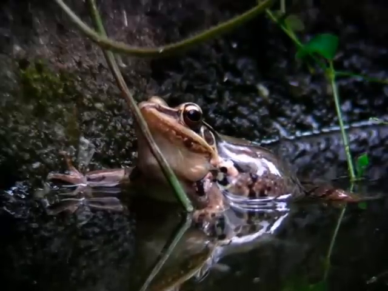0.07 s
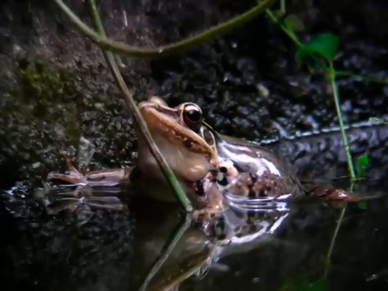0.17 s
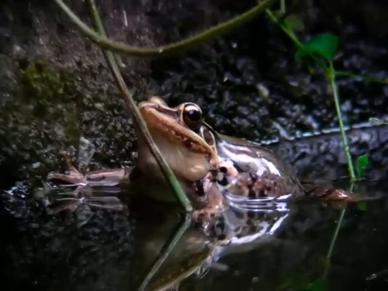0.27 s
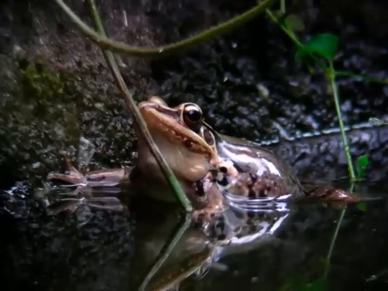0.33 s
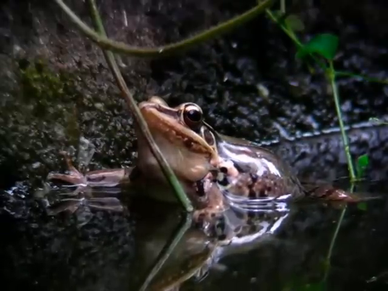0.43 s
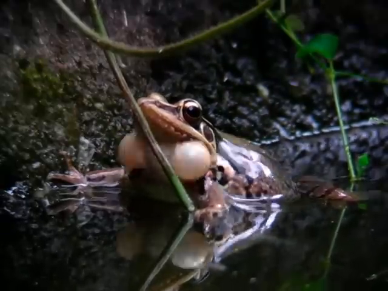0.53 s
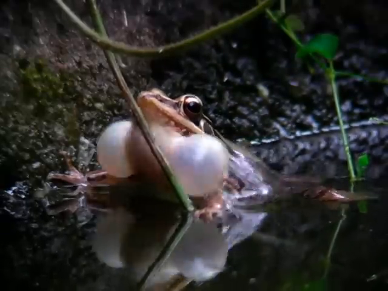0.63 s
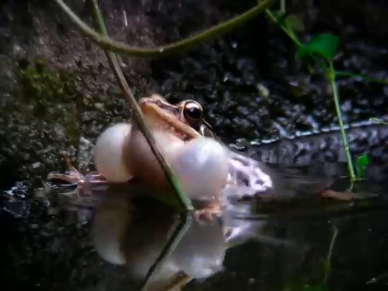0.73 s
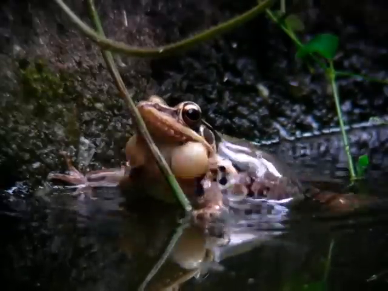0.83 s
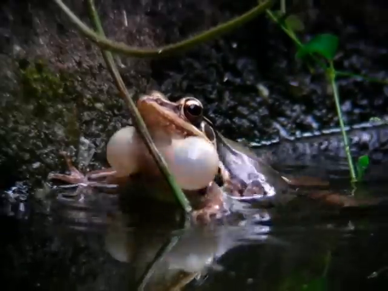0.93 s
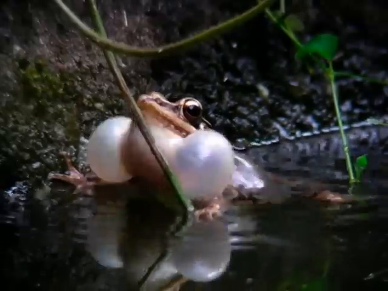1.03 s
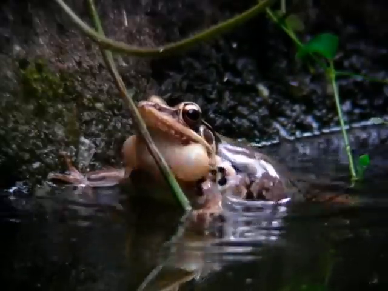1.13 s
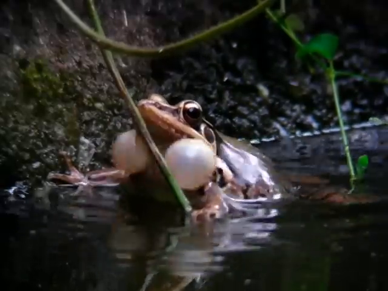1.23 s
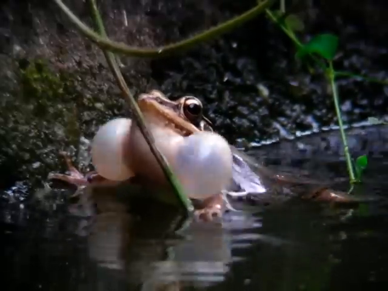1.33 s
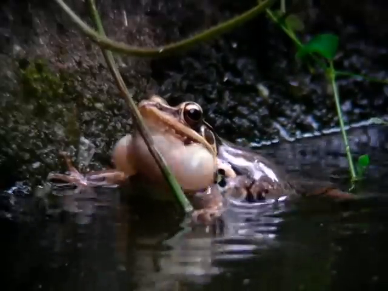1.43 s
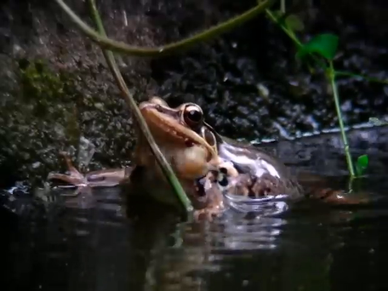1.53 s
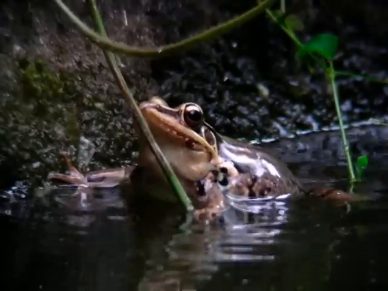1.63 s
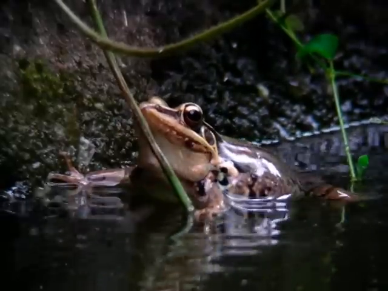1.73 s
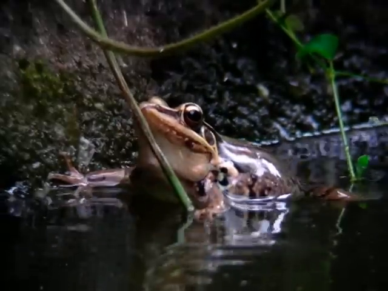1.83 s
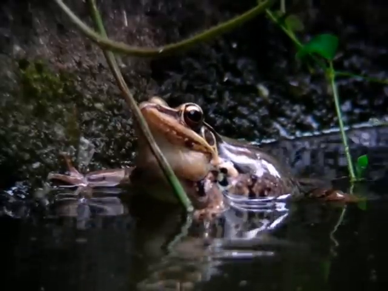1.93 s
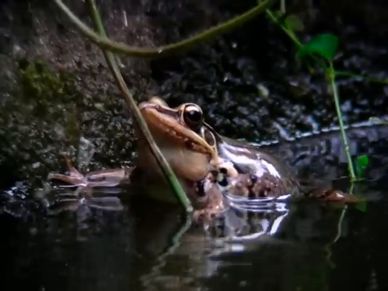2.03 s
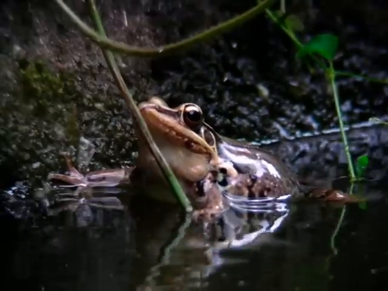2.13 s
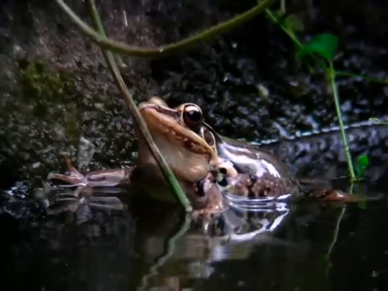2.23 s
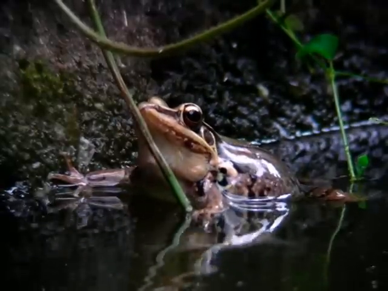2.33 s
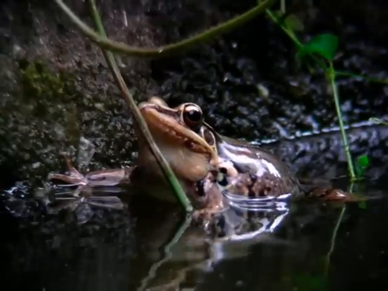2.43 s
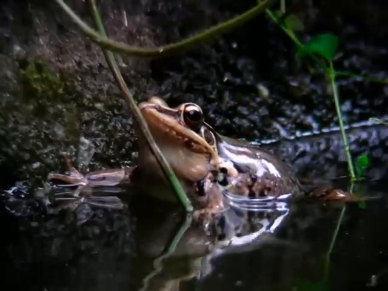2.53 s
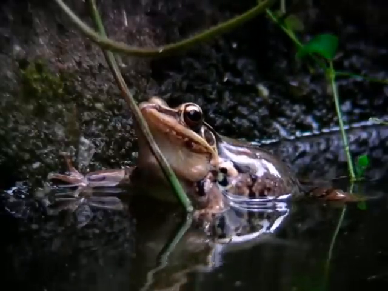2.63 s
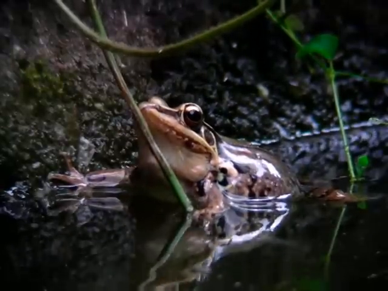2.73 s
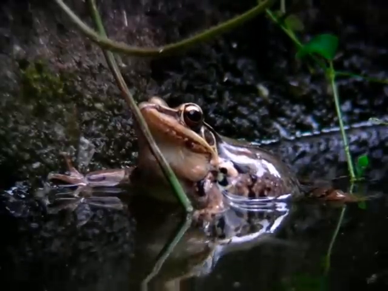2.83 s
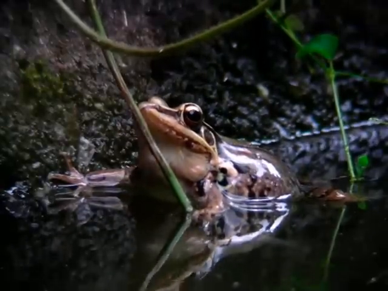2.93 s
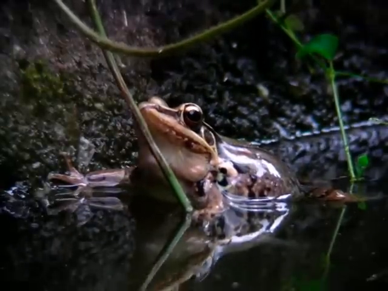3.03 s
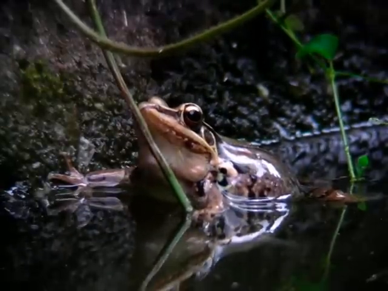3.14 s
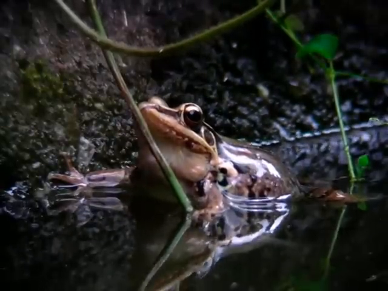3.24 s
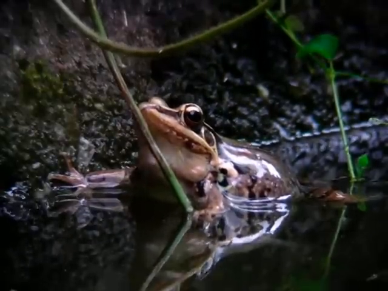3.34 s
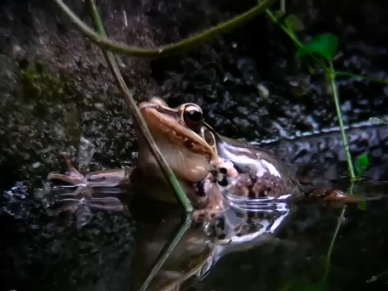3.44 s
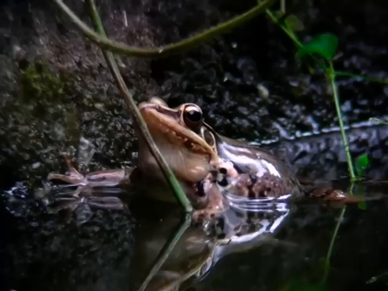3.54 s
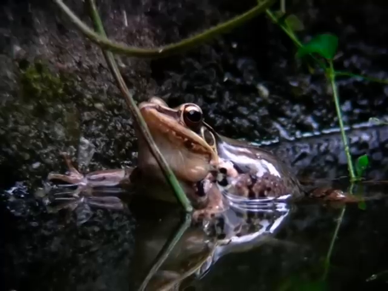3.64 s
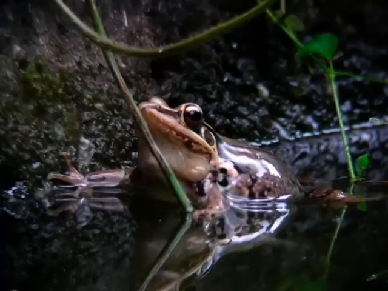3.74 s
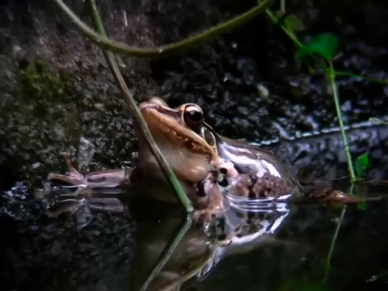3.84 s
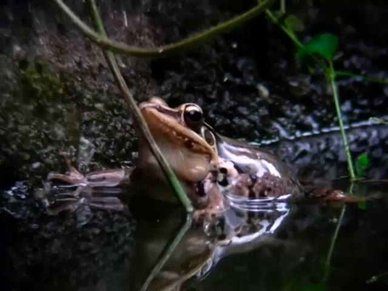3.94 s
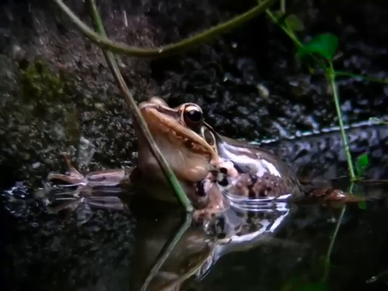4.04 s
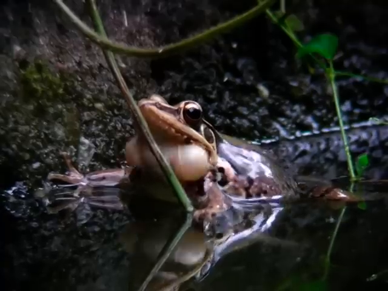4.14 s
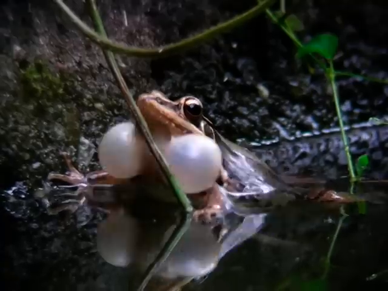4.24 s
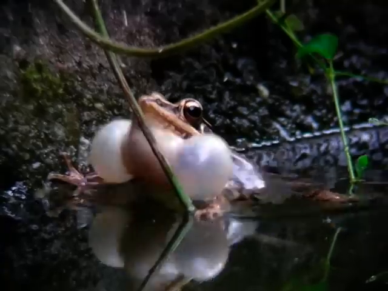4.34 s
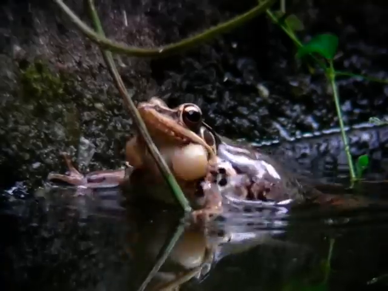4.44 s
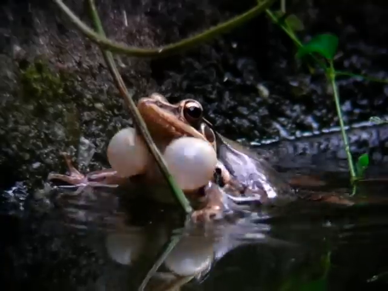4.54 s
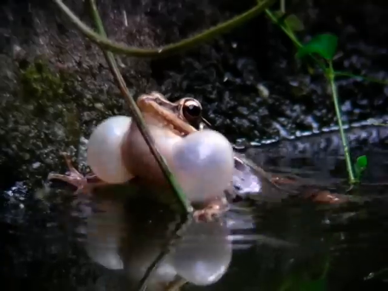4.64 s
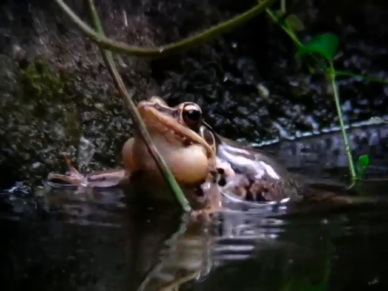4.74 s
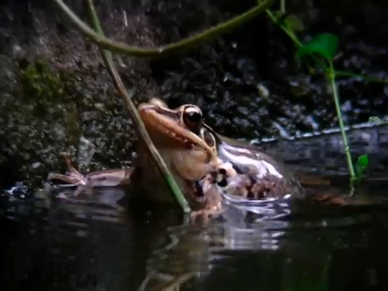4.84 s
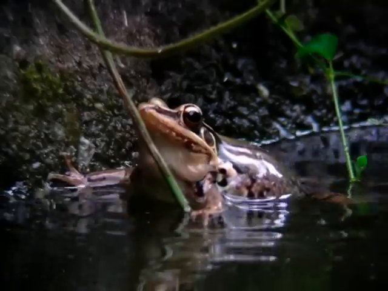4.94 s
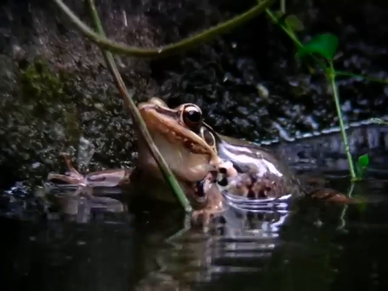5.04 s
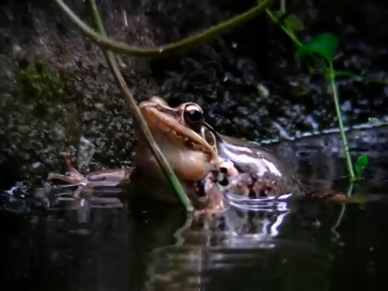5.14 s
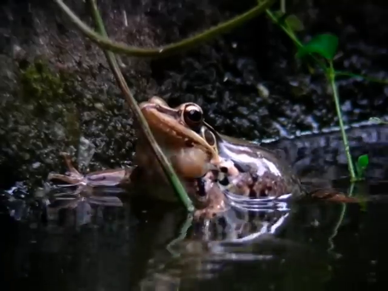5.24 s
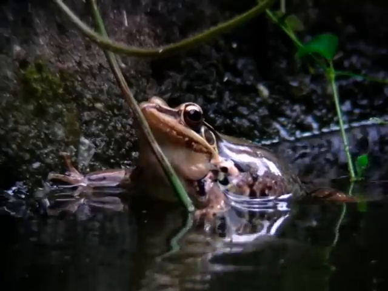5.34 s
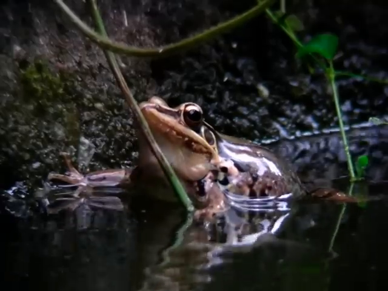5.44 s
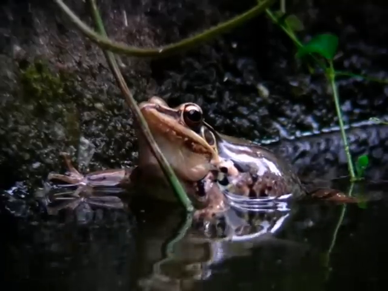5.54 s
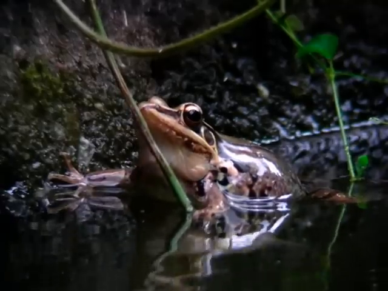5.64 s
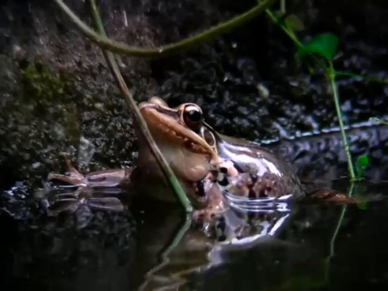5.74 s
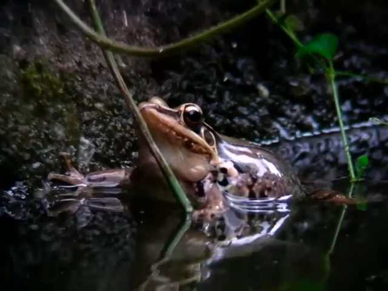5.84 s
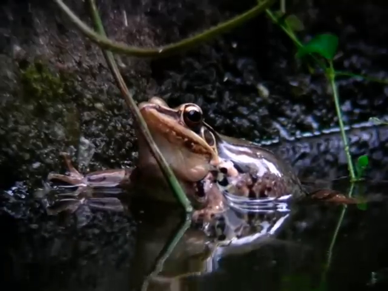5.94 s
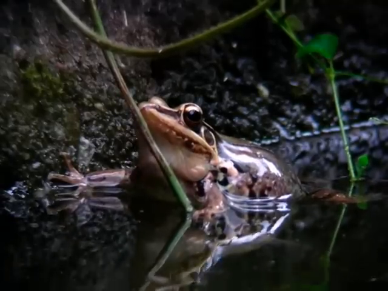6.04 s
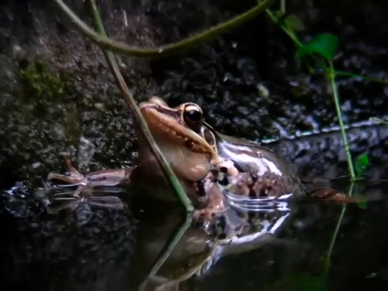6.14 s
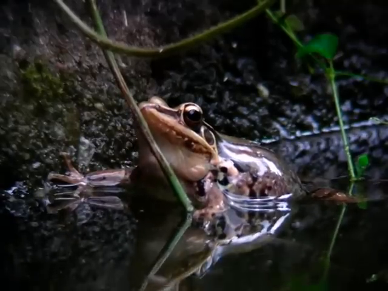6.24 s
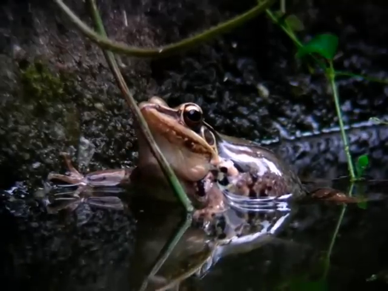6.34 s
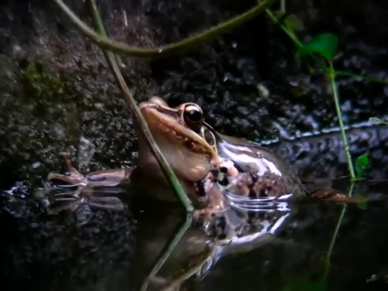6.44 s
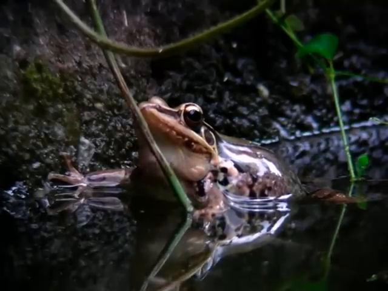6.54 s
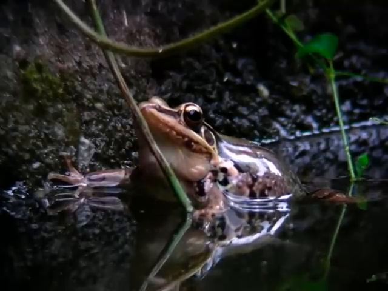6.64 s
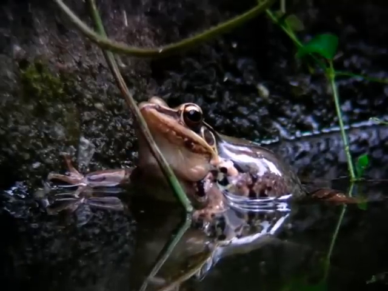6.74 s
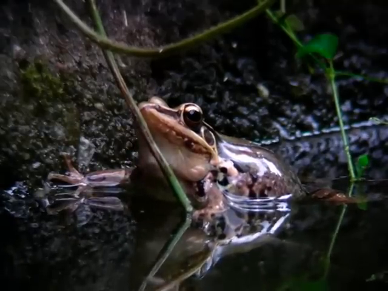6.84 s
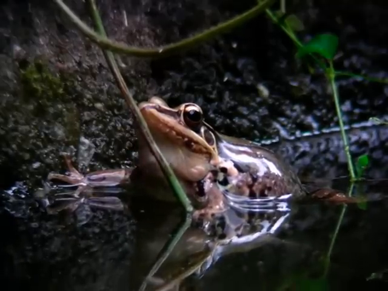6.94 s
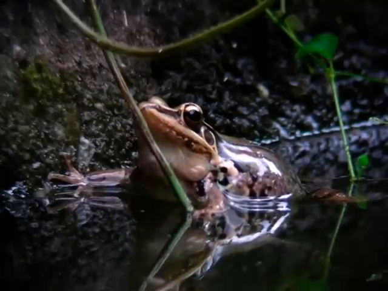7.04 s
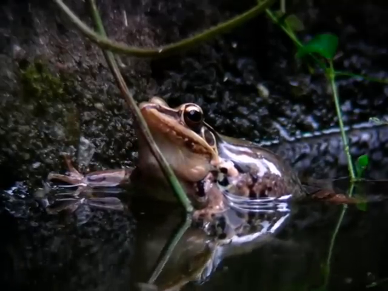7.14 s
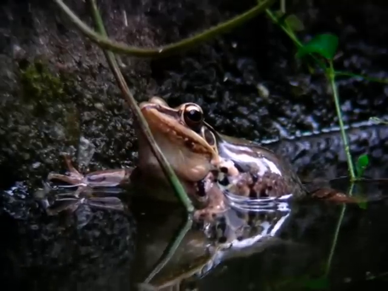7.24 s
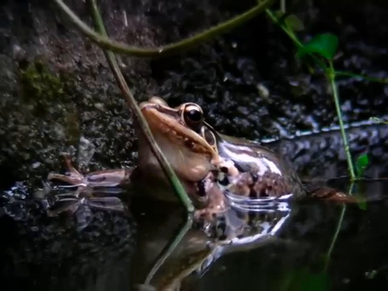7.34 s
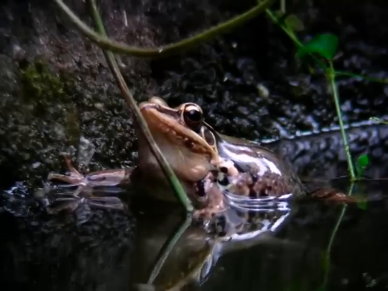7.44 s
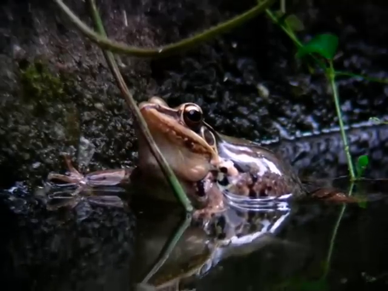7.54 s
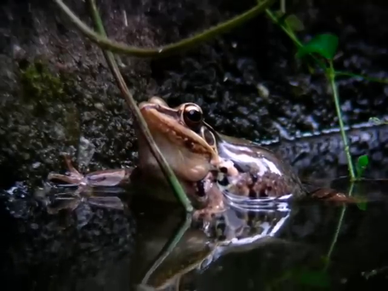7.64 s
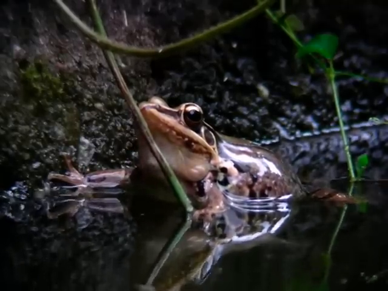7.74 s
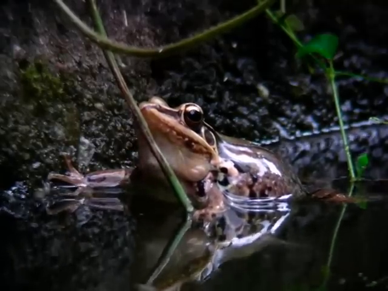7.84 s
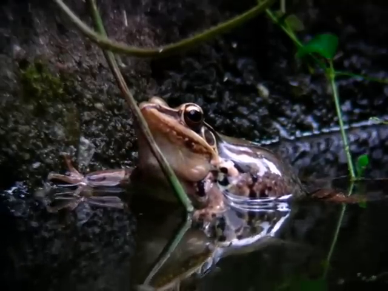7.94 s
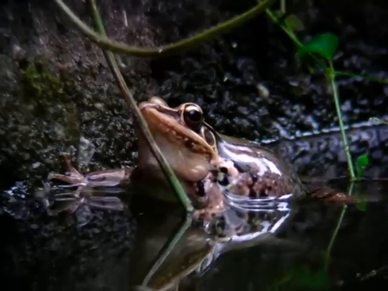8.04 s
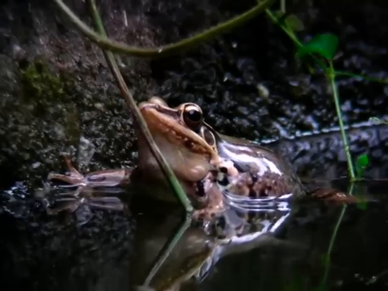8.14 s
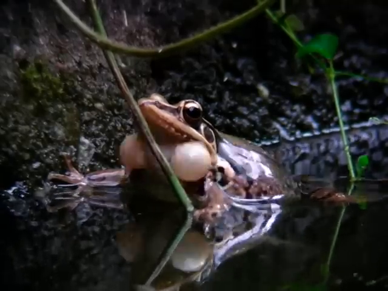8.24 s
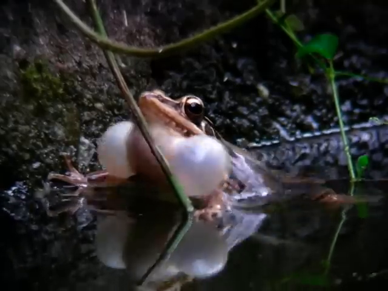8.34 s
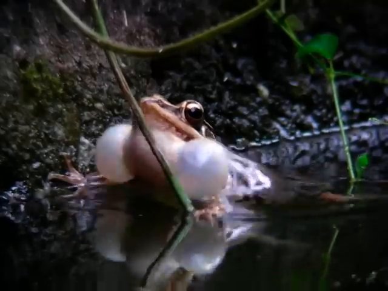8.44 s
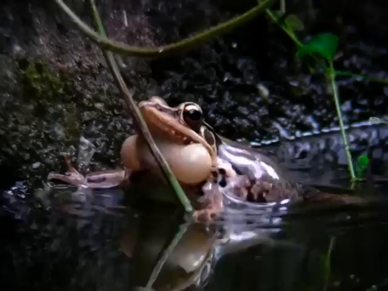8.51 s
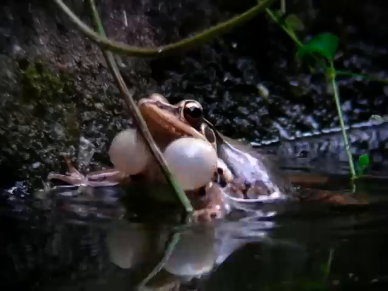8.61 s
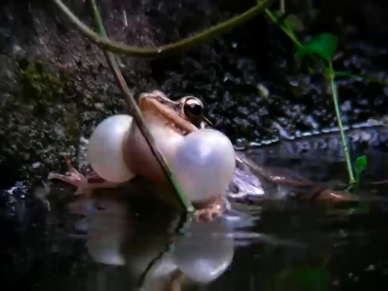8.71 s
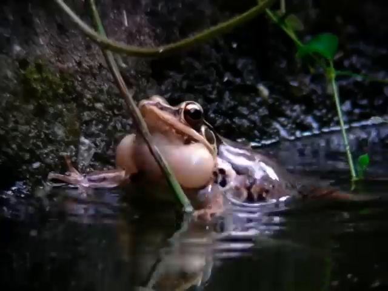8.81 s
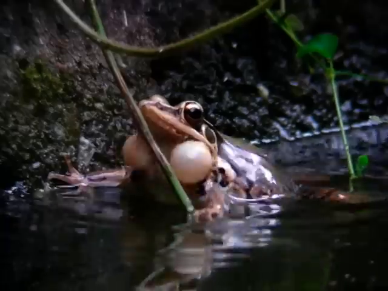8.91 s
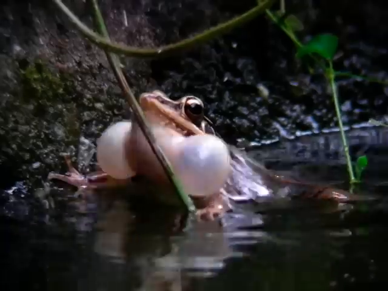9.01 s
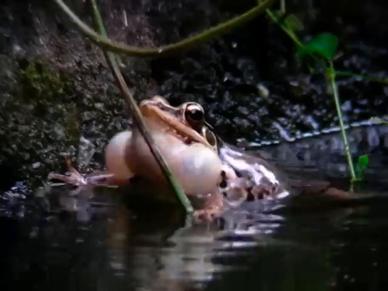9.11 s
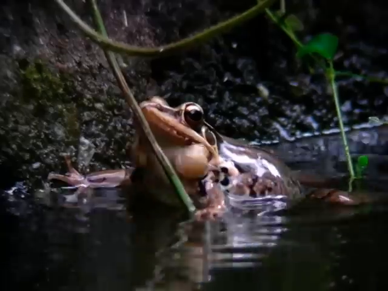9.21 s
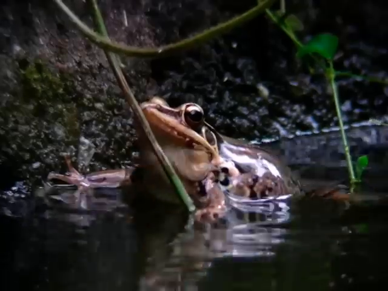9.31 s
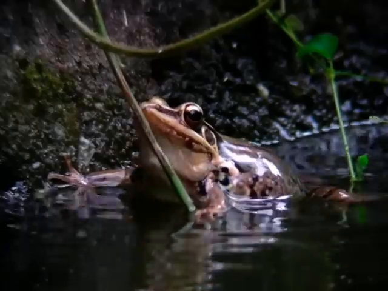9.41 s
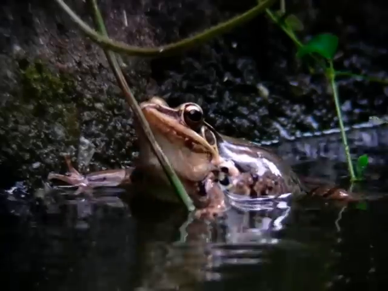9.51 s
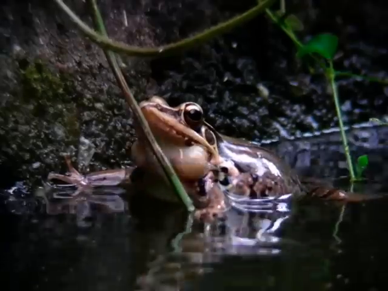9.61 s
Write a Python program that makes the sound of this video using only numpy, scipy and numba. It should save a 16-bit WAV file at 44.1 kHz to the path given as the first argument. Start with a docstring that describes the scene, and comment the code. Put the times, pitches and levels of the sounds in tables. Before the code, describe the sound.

A close frog gives three quick nasal barks, each a low grunt, hard snap, rising honk and brief rattle. Softer frogs bark and croak further off to the right. One longer, rougher bark from a neighbour follows, then a close pair, a long lull of distant calls, and a final trio. Soft water hiss, a few drips, high insects and stone echoes surround the close stereo microphone.

```python
"""Barking frogs by night water

Close frogs in shallow water below a stone wall bark through two vocal sacs: one often, a close neighbour once, long and
rough. A bark is a low grunt, a snap as the sacs go taut, a nasal note that climbs while the swelling sacs ring lower,
a second snap and a slow rattle. Trains of claps ring throat and sacs; frogs further off bark and croak the same way.
Shaped noise makes hissing water, short bursts, insects and air; sines make a hum; ringing bubbles make drips; stone echoes."""
import sys
import numpy as np
from scipy import signal
from scipy.fft import rfft, irfft, next_fast_len
from scipy.io import wavfile
from scipy.ndimage import uniform_filter1d
from numba import njit

SR = 44100
rng = np.random.default_rng(int(sys.argv[2]) if len(sys.argv) > 2 else 0)


def dump(signal):
    """Clip the signal to [-1, 1] and save it as 16-bit WAV at the path in sys.argv[1]."""
    limited = np.clip(np.atleast_2d(signal).T, -1, 1)
    pcm = np.round(limited * 32767).astype(np.int16)
    wavfile.write(sys.argv[1], SR, pcm)


N = 426447
TIME = np.arange(N) / SR

# a faint rough swell of sound just ahead of each bark lasts this long, apart from its soft ends
SWELL_S = 0.048
# length of the close grunt, and base length of the far one
GRUNT_S, FAR_GRUNT_S = 0.022, 0.024
# the close sacs' resonance as the rattle begins, which the second snap shares
RATTLE_SAC_HZ = 1437


def from_db(db):
    """Decibels to gain."""
    return 10 ** (np.asarray(db) / 20)


def rms_one(x):
    """Scale to an average strength (rms) of 1."""
    return x / np.sqrt(np.mean(x ** 2) + 1e-20)


def at_hz(points, hz):
    """Read a curve between its points on a log-frequency axis."""
    known, values = np.transpose(points)
    return np.interp(np.log(hz + 1e-9), np.log(known), values)


def cut(x, hz, kind, order=2):
    """Butterworth filter: keep the lows, the highs or a band."""
    return signal.sosfilt(signal.butter(order, np.minimum(hz, SR / 2 - 1), kind, fs=SR, output="sos"), x)


def add(track, s, sound):
    """Mix a sound into a track at a time in seconds."""
    start = max(round(s * SR), 0)
    track[start:start + len(sound)] += sound[:N - start]


def drift(rate, size):
    """Random wander around zero: a new random value rate times a second, joined by straight lines."""
    steps = np.arange(size) * rate / SR
    values = rng.standard_normal(size // 20 + 2)
    return np.interp(steps, np.arange(len(values)), values)


def stereo_noise(likeness):
    """White noise in two channels; likeness is their correlation."""
    mid, side = rng.standard_normal((2, N))
    likeness = np.clip(likeness, -1, 1)
    return np.sqrt(1 + likeness) * mid + np.sqrt(1 - likeness) * side * [[1], [-1]]


def coloured(x, spectrum):
    """Shape a noise with a spectrum, then scale to rms 1."""
    size = next_fast_len(N)
    gain = from_db(at_hz(spectrum, np.fft.rfftfreq(size, 1 / SR)))
    return rms_one(irfft(rfft(x, size) * gain, size)[..., :N])


def glide(start, end, along):
    """A straight move from start to end as along goes from 0 to 1."""
    return start + (end - start) * along


def ease(t, length_s):
    """A smooth step from 0 to 1."""
    return np.sin(np.pi / 2 * np.clip(t / length_s, 0, 1)) ** 2


def span(length_s):
    """The clock of one sound: in seconds, and from 0 to 1."""
    t = np.arange(int(max(length_s, 0.005) * SR)) / SR
    return t, t / t[-1]


def gate(t, attack_s, release_s):
    """Fade in, hold, fade out."""
    return np.clip(t / attack_s, 0, 1) * np.clip((t[-1] - t) / release_s, 0, 1)


def water_and_bursts():
    """Fine hiss of noise follows the flow; short bursts of like noise start at once and die away."""
    # strength of the flow, used relative to its mean: (time [s], level [dB])
    flow = [(0.0, -59), (0.56, -60.5), (0.94, -55), (1.5, -61), (1.99, -58.5), (2.26, -62.5), (3.2, -61.5),
            (3.55, -59.5), (4.04, -56.5), (4.63, -63.5), (8.37, -64.5), (9.67, -62.5)]
    # colour of the hiss and the bursts: (frequency [Hz], relative level [dB])
    water_colour = [(300, 17), (1500, 15.5), (3000, 12), (6000, 9), (8000, 12.5), (11500, 5), (15000, 0.5)]
    # short bursts of noise; those at 4.255 and 8.343 s are the noisy edge of the frog's first snap:
    # (time [s], relative level [dB], time to fall by 60 dB [s])
    burst_table = [(.79, -48.5, 0.52), (3.405, -43.5, 0.032), (3.492, -46.5, 0.27), (3.913, -41.5, 0.028),
                   (4.255, -42, 0.021), (7.11, -52, 0.011), (8.343, -28.5, 0.0033)]
    flow_db = np.interp(TIME, *np.transpose(flow))
    hiss_db = -46.5 + 0.9 * (flow_db - flow_db.mean()) + 1.2 * drift(90, N)
    hiss = from_db(hiss_db) * coloured(stereo_noise(0.011), water_colour)
    flare = np.zeros(N)
    for s, level_db, t60 in burst_table:
        add(flare, s, from_db(level_db + 10.5 - 60 * TIME[:SR // 2] / t60))
    bursts = flare * coloured(stereo_noise(0.315), water_colour)
    return hiss + cut(bursts, 400, "high")


def insects(chorus_db=-50):
    """Narrow high noise: a dense chorus, and a cricket chirping in pairs about four times a second."""
    shrill = [(6500, -51.5), (8000, -52), (8700, -17.5), (9300, -14.0),
              (10000, -17.5), (10700, -29.5), (11800, -76), (14000, -45)]
    wide = stereo_noise(-0.35)
    flutter_db = 1.0 * drift(35, N)
    chorus = from_db(chorus_db + flutter_db) * coloured(wide, shrill)
    # time within each pair of chirps [s], slightly unsteady
    beat = (TIME - 0.212 + 0.006 * drift(2, N)) % 0.252
    first_chirp = np.exp(-((beat - 0.03) / 0.016) ** 2)
    second_chirp = np.exp(-((beat - 0.085) / 0.016) ** 2)
    tone = rms_one(cut(stereo_noise(-0.3), [6720, 6900], "band"))
    return chorus + from_db(-55) * (first_chirp + second_chirp) * tone


def night(air_db=-52):
    """Low murmur of the air as shaped noise, with steady electric tones as sines."""
    # colour of the air noise: (frequency [Hz], relative level [dB])
    air_colour = [(25, -60), (60, 4), (110, 10), (220, 8.5), (450, 11), (800, -2), (1200, 5.5),
                  (1900, -40.5), (4000, -7), (7000, -57), (14000, -31.5)]
    # electric tones: (frequency [Hz], rms level [dB])
    tones = [(60, -99), (119.8, -64), (179.8, -64), (240, -63.5), (15734, -72)]
    hum = np.zeros(N)
    for hz, db in tones:
        hum += from_db(db) * np.sqrt(2) * np.sin(2 * np.pi * (hz * TIME + rng.random()))
    return from_db(air_db) * coloured(stereo_noise(0.17), air_colour) + hum


@njit
def moving_pole(x, poles):
    """A ringing state that turns and shrinks by one pole a sample."""
    out, state = np.zeros(len(x)), 0j
    for i in range(len(x)):
        state = state * poles[i] + x[i]
        out[i] = state.imag
    return out


def resonate(x, hz, width_hz):
    """A resonance whose centre may move; a unit click rings with height about 1."""
    return moving_pole(x, np.exp((2j * np.pi * hz - np.pi * width_hz) / SR) * np.ones(len(x)))


def even(x, size=440):
    """Hold the rms near 1 over a few cycles, with less lift for very quiet parts."""
    power = uniform_filter1d(x ** 2, size)
    return x / np.sqrt(np.maximum(power, 0.1 * np.mean(x ** 2)) + 1e-20)


def croak(pitch, sac_hz, upper_hz, low_db, throat_db, sac_db, rough, sac_width_hz, upper_width_hz, upper_db,
          jitter, rasp):
    """The larynx claps once a cycle and rings throat and sacs; the fundamental radiates from the body."""
    size, rough = len(pitch), np.clip(rough, 0, 1)
    phase = np.cumsum(pitch * np.exp(jitter * rough * drift(400, size))) / SR
    cycle = np.floor(phase).astype(int)
    # a rough voice claps unevenly, strong and weak in turn
    uneven_db = 4.5 * rough * rng.standard_normal(size)
    force = from_db(uneven_db - 6.3 * rough * (np.arange(size) % 2))[cycle]
    air = rasp * (1.62 + 0.23 * rough) * rng.standard_normal(size) * np.exp(-3 * (phase - cycle))
    claps = force * (np.diff(cycle, prepend=-1) + air)
    body = np.sqrt(2) * np.sin(2 * np.pi * phase) * from_db(6.9 * rough * drift(210.5, size))
    # the throat tunes with the sacs
    throat = even(cut(resonate(claps, 0.52 * sac_hz, 880), [480, 1350], "band"))
    ring = cut(resonate(claps, sac_hz, sac_width_hz), 2610, "low", order=4)
    sacs = even(cut(ring, 496, "high"))
    upper = even(cut(resonate(claps, upper_hz, upper_width_hz), [2600, 5800], "band", order=4))
    return from_db(low_db) * body + from_db(throat_db) * throat + from_db(sac_db) * (sacs + from_db(upper_db) * upper)


def hoarse(pitch, edges_hz):
    """A puff of air in every cycle, as a band of noise; rms 1."""
    puffs = rng.standard_normal(len(pitch)) * np.exp(-3 * (np.cumsum(pitch) / SR % 1))
    return rms_one(cut(puffs, edges_hz, "band", order=3))


def soft_note(length_s, pitches, sacs, body_db, throat_db, sac_db, rough, growth_db=0, swell_s=0.007, fade_s=0.009):
    """A short gliding train of claps that swells and fades; rough ones start more softly."""
    rise_s = swell_s * (1 + 2 * abs(rough))
    t, along = span(rise_s / 2 + length_s + fade_s)
    # the pitch settles as the push steadies
    pitch = glide(pitches[1], pitches[0], (1 - along) ** 1.5)
    pitch = pitch * (1 + 0.025 * drift(70, len(t)))
    note = croak(pitch, glide(*sacs, along), 3750, body_db + 3.5, throat_db - 4, sac_db, rough,
                 sac_width_hz=188, upper_width_hz=4700, upper_db=-30.5, jitter=0.1, rasp=0.51 * abs(rough))
    # a hoarse edge above the sac resonance lessens as the first of the two pitches leaves 325 Hz
    octaves_off = abs(np.log2(pitches[0] / 325))
    edge_db = max(sac_db, throat_db) - 27 - 32 * octaves_off
    note = note + from_db(edge_db) * hoarse(pitch, [1950, 2900])
    arch_db = 4 * (np.sin(np.pi * along) - 0.6) + 1.3 * drift(90, len(t))
    return note * from_db(arch_db + growth_db * (along - 1.0)) * gate(t, rise_s, 2 * fade_s)


def faint_swell(level_db):
    """A faint rough swell of sound just ahead of each bark, made from uneven claps that grow louder."""
    return soft_note(SWELL_S, (381, 381), (1330, 1580), level_db - 10.5, level_db - 7, level_db,
                     rough=0.97, growth_db=13.5)


def far_barks(note_overlap_s=0.008, rattle_overlap_s=0.007, grunt_early_s=0.00051):
    """A cleaner grunt, a rough note of rising pitch and falling sac ring, and a rattle run together."""
    # barks from further off; times and lengths are before overlaps and soft ends, levels are relative:
    # (start [s], rattle start [s], rattle length [s], pitch [Hz], rattle pitch [Hz], taut sac [Hz],
    #  grunt [dB], note [dB], rattle [dB], brightness [dB], throat [dB])
    bark_table = [(0.171, .227, 0.053, 324.3, 260, 1565, -24, -15, -31, 14, -4),
                  (0.505, 0.561, 0.047, 319.5, 304, 1560, -27, -17, -32, 14, -6.5),
                  (1.624, 1.714, 0.049, 287.5, 297, 1840, -28, -19, -27.5, 5.5, -2),
                  (2.15, 2.231, 0.066, 325, 344, 1610, -34, -41, -30, -8, -1),
                  (2.567, 2.646, 0.082, 318, 331.7, 1500, -35, -40, -32, -7, -2.5),
                  (3.109, 3.163, .06, 334.6, 330, 1784, -23, -15.5, -29.5, 12.5, -6.5),
                  (3.549, 3.613, 0.084, 294.4, 295.2, 1240, -35.5, -43, -38.5, -2, 2.5),
                  (5.493, 5.534, 0.034, 402.4, 470, 1930, -27.5, -20.5, -27, 10.5, -1),
                  (5.789, 5.838, 0.041, 378, 453, 1610, -32.5, -22, -30, 9, 2.5),
                  (6.614, 6.671, 0.038, 322.4, 339, 1880, -31, -35, -38, -2, 4),
                  (7.024, 7.081, 0.03, 316, 334.7, 1800, -34, -36, -36, -3, 4),
                  (7.283, 7.342, 0.068, 322, 336, 1790, -28.5, -20, -29, 9, -3),
                  (7.715, 7.811, 0.15, 330.6, 311.2, 1680, -41.5, -39, -37, -14, 11),
                  (8.132, 8.209, 0.12, 313, 385.4, 1500, -42, -47, -45, -3.5, 12),
                  (8.797, 8.864, 0.072, 323, 374, 1450, -33.5, -39, -39, -2, 6),
                  (9.177, 9.231, 0.034, 323, 311.3, 2050, -31, -17.5, -32.5, 11.5, 2.5),
                  (9.482, 9.531, 0.043, 313.6, 437.5, 1820, -33, -22.5, -34.5, 12, 2)]
    note_rise = 1.2   # pitch ratio across the note
    swollen_share, relaxed_share = 0.74, 0.82   # sac resonance after note and rattle, relative to taut
    rattle_sag = 0.05   # share of the pitch: it starts this much high and ends half as much low
    out = np.zeros(N)
    for (s, rattle_s, rattle_length, pitch, rattle_hz, sac_hz,
         grunt_db, note_db, rattle_db, bright_db, throat_db) in bark_table:
        note_s, swollen_hz = s + FAR_GRUNT_S, swollen_share * sac_hz
        add(out, s - SWELL_S, faint_swell(note_db - 17))

        sac_db = grunt_db - 15.5 + 1.19 * bright_db
        push = soft_note(FAR_GRUNT_S, (1.03 * pitch, 0.97 * pitch), (0.716 * sac_hz, 1.33 * sac_hz),
                         grunt_db, (grunt_db + sac_db) / 2 + 2.0 + throat_db, sac_db, rough=0.21, swell_s=0.0018)
        add(out, s - grunt_early_s, push)

        # in bright barks the sacs outweigh the body
        body_db = note_db - 11.5 - 0.5 * bright_db
        note = soft_note(rattle_s - note_s, (pitch, note_rise * pitch), (sac_hz, swollen_hz),
                         body_db, (body_db + note_db) / 2 - 8 + throat_db, note_db, rough=0.5, growth_db=12)
        add(out, note_s - note_overlap_s, note)

        sac_db = rattle_db + bright_db
        pitches = rattle_hz * (1 + rattle_sag), rattle_hz * (1 - rattle_sag / 2)
        claps = soft_note(rattle_length, pitches, (swollen_hz, relaxed_share * sac_hz),
                          rattle_db - 5.0, (rattle_db + sac_db) / 2 - 6 + throat_db, sac_db - 5.5,
                          rough=0.52 + 0.018 * bright_db, growth_db=-6.5)
        add(out, rattle_s - rattle_overlap_s, claps)
    return out


def far_frogs(croak_early_s=0.0077):
    """Frogs further off bark and add single croaks, mostly after a bark."""
    # single croaks; times are before the early start, lengths before soft ends, levels relative:
    # (time [s], length [s], pitch from [Hz], pitch to [Hz], sac centre [Hz],
    #  fundamental [dB], throat [dB], sac [dB], roughness [0-1])
    croak_table = [(0.752, .045, 536, 426.4, 1516, -26.5, -26, -18, 0.17),
                   (1.091, .046, 466.4, 401, 1330, -28.5, -24.5, -20.5, 0.26),
                   (1.977, 0.096, 307, 352, 1150, -48, -46.5, -66, 0.45),
                   (1.811, 0.064, 473, 434, 1290, -40, -42, -35.5, 0.4),
                   (2.291, 0.057, 310.6, 342, 1640, -40, -44, -38.5, 0.9),
                   (2.738, 0.036, 353.4, 330, 1440, -33.5, -38, -39.5, 0.2),
                   (2.337, .072, 444.4, 485.4, 1300, -38.5, -30.5, -41.5, 0.42),
                   (2.773, 0.074, 423.8, 464.6, 1280, -39.5, -31, -43.5, 0.39),
                   (3.386, 0.057, 350, 406, 1390, -41.5, -57.5, -52, 0.3),
                   (6.341, .11, 374, 370, 1084, -63, -55, -85, 0.15),
                   (6.684, 0.072, 435.3, 487, 1315, -37.5, -31.5, -42.5, 0.38),
                   (7.106, 0.0906, 309, 320, 1510, -63, -61, -38.5, 0.75),
                   (7.448, 0.054, 283, 272, 1250, -36.5, -26, -37, 0.8),
                   (7.524, 0.049, 406, 408, 1330, -42.5, -31, -36.5, 0.7),
                   (7.931, 0.057, 428.5, 456, 1210, -40.5, -30.5, -42, 0.55),
                   (9.27, 0.084, 316, 320, 1710, -53, -61, -32, 0.2),
                   (9.582, 0.063, 311, 279, 1380, -42, -55, -32.5, 0.36)]
    sac_rise = 0.093   # the sac resonance climbs from this share below its centre to this share above
    out = far_barks()
    for s, length, pitch_from, pitch_to, sac_hz, body_db, throat_db, sac_db, rough in croak_table:
        sacs = sac_hz * (1 - sac_rise), sac_hz * (1 + sac_rise)
        note = soft_note(length, (pitch_from, pitch_to), sacs, body_db, throat_db, sac_db, rough, fade_s=0.013)
        add(out, s - croak_early_s, note)
    return out


def banks(x, early_db, late_db, early_s=0.023):
    """Close stone scatters a quick echo; the surroundings add a tail that lasts longest near 1300 Hz."""
    # colour of the echo: (frequency [Hz], relative level [dB])
    echo_colour = [(150, -1), (330, 6.5), (600, 4), (900, 9.5), (1300, 4), (1700, 1), (2300, 3),
                   (5000, 6.5), (12000, -13)]
    # length of the tail: (frequency [Hz], time to fall by 60 dB [s])
    echo_t60 = [(200, 0.88), (600, 0.66), (1300, 0.97), (2200, 0.66), (6000, 0.1)]
    t = TIME[:SR]
    white, response = rng.standard_normal((2, 2, SR)), 0
    edges = np.geomspace(150, 9600, num=13)
    for k, (low, high) in enumerate(zip(edges, edges[1:])):
        hz = np.sqrt(low * high)
        early = from_db(early_db) * np.exp(-t / early_s)
        late = from_db(late_db - 60 * t / at_hz(echo_t60, hz))
        # each channel takes a share of the other
        scatter = white[k % 2] + 0.44 * white[k % 2][::-1]
        response = response + from_db(at_hz(echo_colour, hz)) * (early + late) * cut(scatter, [low, high], "band")
    return signal.fftconvolve(x[None], response * np.clip(t / 0.0009, 0, 1), axes=1)[:, :N]


def close_voice(pitch, sac_hz, upper_hz, body_db, sac_db, rough):
    """The voice from close by: crisp claps, little air, and treble that turns hoarse with roughness."""
    throat_db = (body_db + sac_db) / 2 - 9
    voice = croak(pitch, sac_hz, upper_hz, body_db, throat_db, sac_db, rough, sac_width_hz=202,
                  upper_width_hz=200, upper_db=-19.5 - 11 * rough, jitter=0.055, rasp=0.074)
    return voice + from_db(sac_db - 9.5) * rough ** 2 * hoarse(pitch, [2400, 4200])


def grunt(taut_hz, sac_db, rough):
    """A low push fills the sacs; it sags in pitch and dies away as it runs out."""
    t, along = span(GRUNT_S)
    pitch = glide(361.6, 279, along ** 1.1)
    sound = close_voice(pitch, 1.078 * taut_hz, 4560, -18.5, sac_db, rough)
    return sound * from_db(-7 * along ** 2) * gate(t, attack_s=0.0018, release_s=0.0024)


def snap(hz, level_db):
    """One hard clap rings the sac for a few milliseconds."""
    ring = resonate(signal.unit_impulse(1024), hz, 260)
    ring = cut(cut(ring, 3000, "low"), 900, "high")
    return from_db(level_db - 1) * ring / np.abs(ring).max()


def nasal_note(length_s, taut_hz, swollen_hz, end_db, rough):
    """Pitch and level climb with the pressure and the pitch sags at the end; swelling sacs ring lower."""
    start_hz, risen_hz, rise_s, sacs_swell_s = 240.7, 418.3, 0.02, 0.043
    body_end_db, body_growth_db, sac_growth_db = -17, 23, 7
    t, along = span(length_s)
    swollen, to_come = ease(t, sacs_swell_s), 1 - ease(along, 1.0)
    # the last term is the pitch lost as the push runs out
    pitch = glide(start_hz, risen_hz, ease(t, rise_s)) * (1 + 0.07 * along - 0.14 * along ** 4)
    pitch = pitch * (1 + 0.02 * drift(60, len(t)))
    # the thin upper resonance arches up and part of the way back
    upper_hz = 3.847 * swollen_hz * glide(0.75, 0.92, np.sin(0.85 * np.pi * along))
    sound = close_voice(pitch, glide(taut_hz, swollen_hz, swollen), upper_hz,
                        body_end_db - body_growth_db * to_come, end_db - sac_growth_db * to_come, rough)
    return sound * gate(t, attack_s=0.008, release_s=0.0065)


def rattle(length_s, sac_db, rough):
    """Slow claps quicken a little and die away while the sacs relax and ring higher."""
    t, along = span(length_s)
    pitch = glide(254.8, 281.3, along)
    sac_hz, upper_hz = glide(RATTLE_SAC_HZ, 1610, along), glide(5420, 4800, along)
    sound = close_voice(pitch, sac_hz, upper_hz, -27.5 - 128 * t, sac_db - 18 * along, rough)
    return sound * gate(t, attack_s=0.0014, release_s=0.0036)


def to_the_right(x, lag, side_db):
    """A source to the right: the left channel is later by lag samples and softer, the right louder."""
    left = np.interp(np.arange(N) - lag, np.arange(N), x) * from_db(-side_db)
    return np.array([left, x * from_db(side_db)])


def close_barks():
    """Grunt, snap, nasal note, snap, rattle, after a faint swell; each bark has its own place to the right."""
    # close barks, with relative levels; the long rough one at 3.186 s is a close neighbour's:
    # (start [s], rattle start [s], rattle length [s], taut sac [Hz], swollen sac [Hz], grunt [dB], note [dB],
    #  rattle [dB], first snap [dB], second snap [dB], roughness [0-1], to the right [0-1])
    bark_table = [(.6125, 0.6854, 0.025, 2030, 1490, -17, -11.5, -8.5, 1, -14, 0.34, 0.18),
                  (0.9251, 0.996, 0.056, 1880, 1280, -24.5, -10.5, -7.5, 0, -12, 0.36, 0.26),
                  (1.2653, 1.354, 0.074, 1710, 1245, -29, -13, -11, -3.5, -3, 0.37, 0.42),
                  (3.186, 3.2633, .1, 2000, 1560, -22, -12.5, -15.5, -2.5, -2, 0.56, 0.54),
                  (4.2309, 4.2974, 0.027, 1980, 1510, -16, -8.5, -8, 0.5, -13, 0.31, 0.21),
                  (4.5456, 4.6177, 0.036, 1795, 1275, -24.5, -12, -11.5, -1.5, -2.5, 0.04, 0.21),
                  (8.3202, 8.387, 0.042, 2050, 1440, -16.5, -8, -8.5, 1, -4, .12, 0.2),
                  (8.634, 8.7075, 0.038, 1780, 1274, -20.5, -11, -12, -1, -4, 0.23, 0.23),
                  (8.958, 9.034, 0.047, 1720, 1265, -27.5, -13, -16.5, -3.5, -32, 0.02, 0.34)]
    out = np.zeros((2, N))
    for (s, rattle_s, rattle_length, taut_hz, swollen_hz, grunt_db, note_db,
         rattle_db, first_db, second_db, rough, side) in bark_table:
        bark, snap_s = np.zeros(N), s + GRUNT_S
        # a pause before the rattle, shorter in rough barks
        pause_s = 0.0055 * (1 - rough)
        add(bark, s - SWELL_S, faint_swell(note_db - 20.5))
        add(bark, s, grunt(taut_hz, grunt_db, rough))
        add(bark, snap_s, snap(taut_hz, first_db))
        add(bark, snap_s, nasal_note(rattle_s - snap_s - pause_s, taut_hz, swollen_hz, note_db, rough))
        add(bark, rattle_s, snap(RATTLE_SAC_HZ, second_db))
        add(bark, rattle_s, rattle(rattle_length, rattle_db, rough))
        out += to_the_right(bark, lag=6 * side, side_db=1.8 * side)
    return out


def drips(width_hz=45):
    """Each drop into the pool traps a bubble that rings briefly and rises in pitch."""
    # drops: (time [s], relative level [dB], starting bubble pitch [Hz])
    drops = [(3.914, -31.5, 1360), (3.991, -39, 1100), (5.029, -36.5, 1190), (5.116, -35.5, 696),
             (6.365, -37.5, 724), (6.435, -38, 675), (6.553, -39.5, 1070)]
    out, t = np.zeros(N), TIME[:4096]
    for s, level_db, hz in drops:
        bubble = resonate(signal.unit_impulse(len(t)), hz * (1 + 2 * t), width_hz)
        add(out, s, from_db(level_db - 0.5) * bubble)
    return out


def scene():
    """Close frogs right of the middle, the others further off to the right, the night all round."""
    # small bodies radiate no bass
    near, far = [cut(x, 293.0, "high", order=4) for x in (close_barks(), far_frogs())]
    frogs = near + to_the_right(far, lag=5.9, side_db=1.0)
    echo = banks(near.mean(axis=0), early_db=-48, late_db=-51) + banks(far, early_db=-40, late_db=-50)
    # the echo drops away briefly after the close neighbour's long bark
    dip_s, fall_s, recover_s = 3.35, 0.048, 0.32
    dip = ease(TIME - dip_s, fall_s) - ease(TIME - dip_s - fall_s, recover_s)
    return frogs + echo * from_db(-8.5 * dip) + water_and_bursts() + drips() + insects() + night()


def record(dry, threshold_db=-11, release_db_per_s=60, attack_s=0.0184):
    """Gain control ducks after levels above the threshold; peaks are rounded and the top is cut."""
    power = np.abs(uniform_filter1d(np.mean(dry ** 2, axis=0), size=128))
    level_db = 10 * np.log10(power + 1e-12)
    # the duck jumps up with the excess level and falls back steadily, then is smoothed
    fall = release_db_per_s * TIME
    duck_db = np.maximum.accumulate(np.maximum(level_db - threshold_db, 0) + fall) - fall
    keep = np.exp(-1 / (attack_s * SR))
    held = dry * from_db(-signal.lfilter([1 - keep], [1, -keep], duck_db))
    rounded = held / (1 + (held / 0.9) ** 6) ** (1 / 6)
    # steep cut above 15.9 kHz
    return signal.sosfilt(signal.ellip(12, 0.1, 80, 15900, fs=SR, output="sos"), rounded)


dry = scene()
out = record(dry)
dump(out)
```